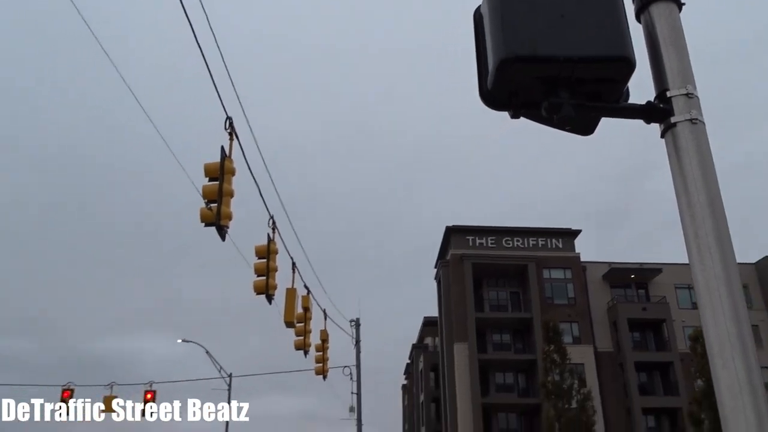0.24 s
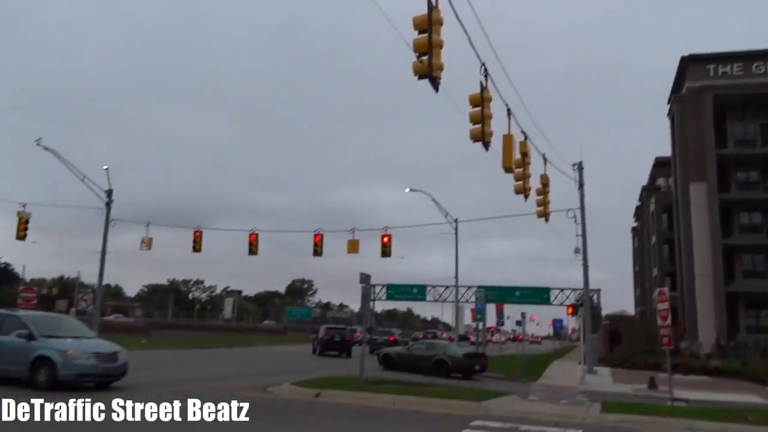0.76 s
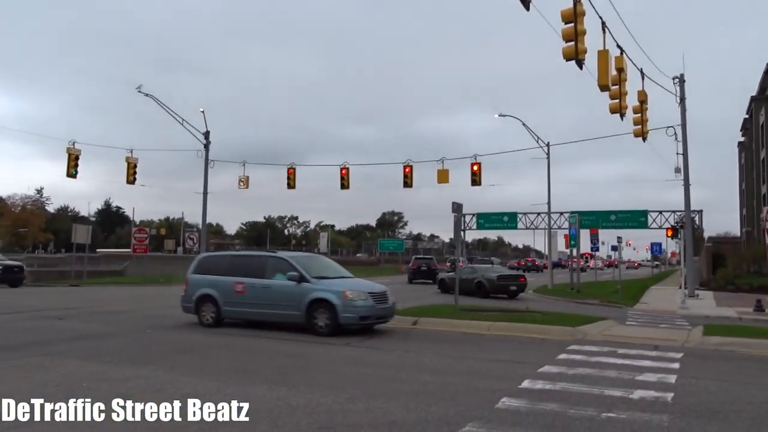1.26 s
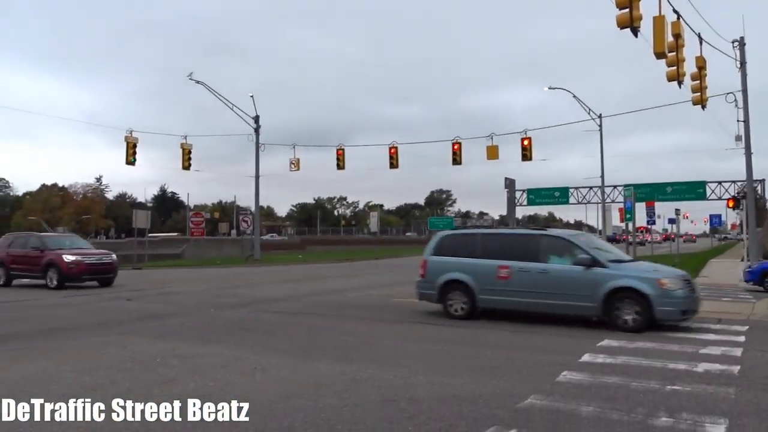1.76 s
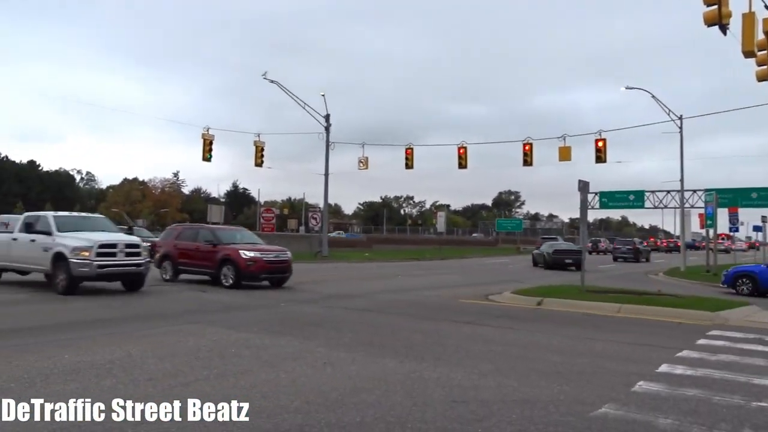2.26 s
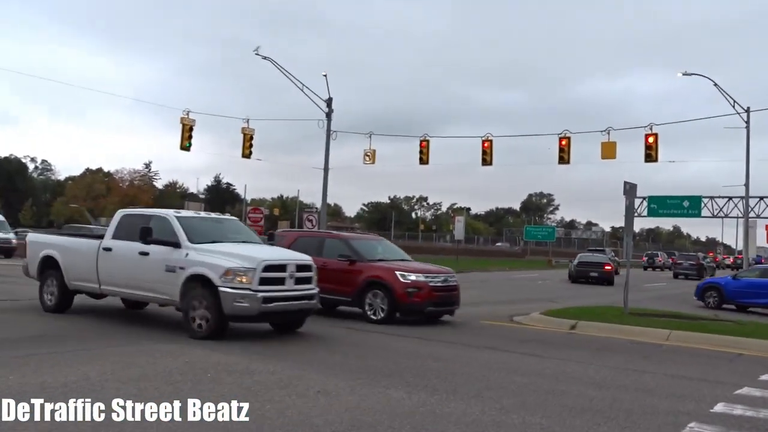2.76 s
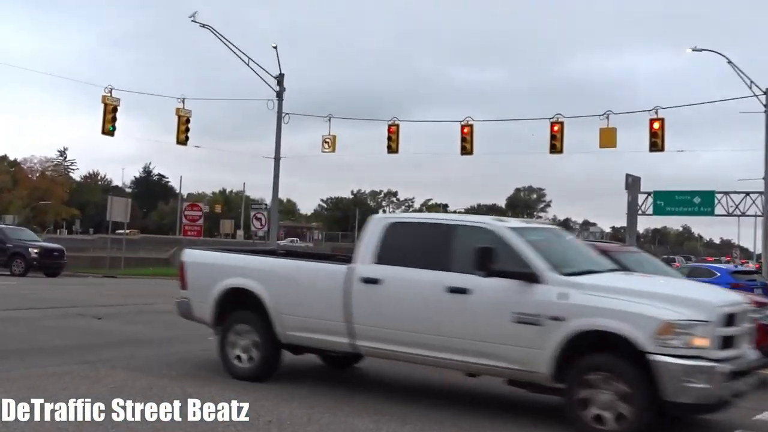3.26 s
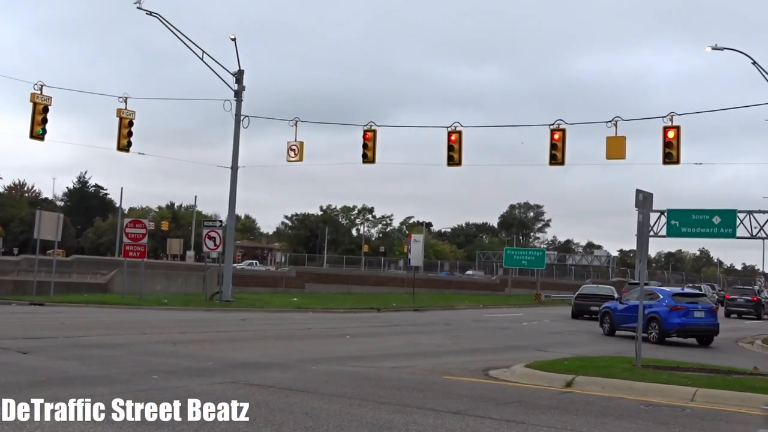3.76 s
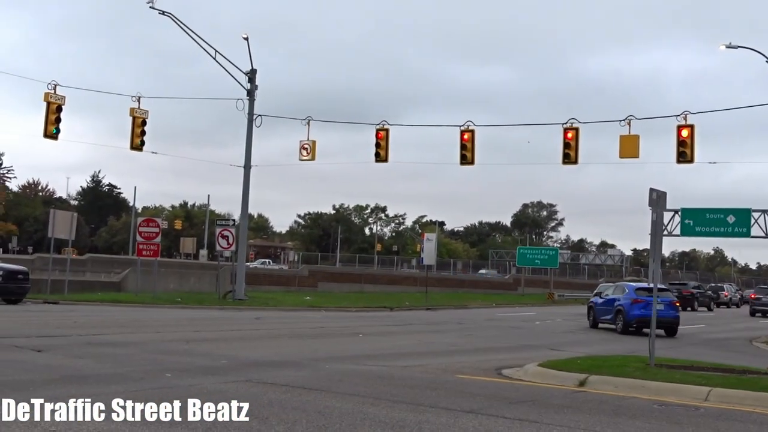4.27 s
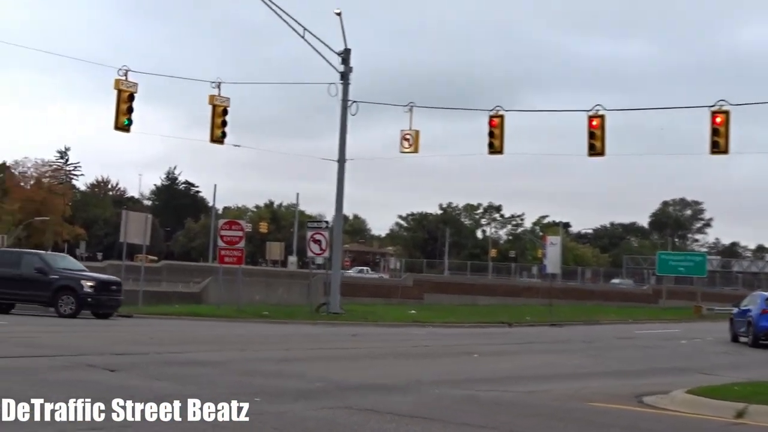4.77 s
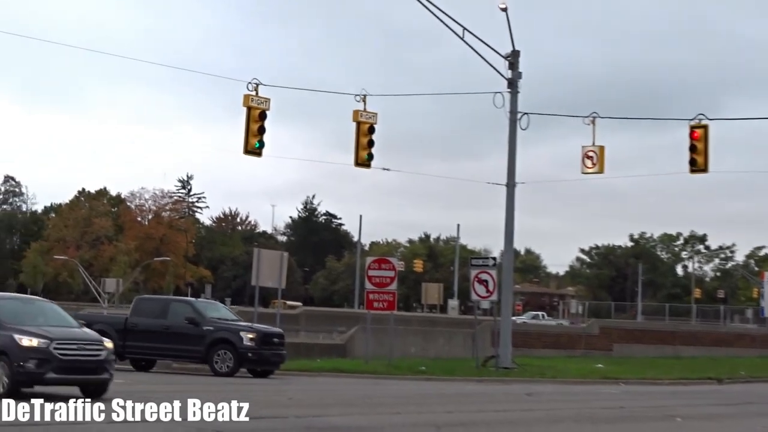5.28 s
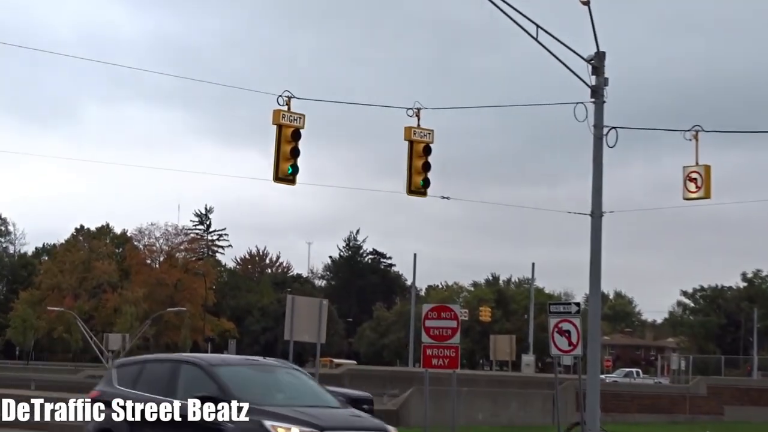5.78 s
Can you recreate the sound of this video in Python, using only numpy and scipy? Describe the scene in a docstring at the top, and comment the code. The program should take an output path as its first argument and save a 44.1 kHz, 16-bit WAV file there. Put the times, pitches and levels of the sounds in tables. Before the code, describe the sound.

Deep, burbling V8 exhaust pulls, changes up, pulls again and fades after another shift, amid passing tyres and faint, thin chirps.

```python
"""V8 at a busy road junction

A V8 with a boomy exhaust accelerates, shifts up, pulls on and shifts up again, heard on two microphone ports.
Overtones of its eight-cylinder cycle make the firing note, a burble from the uneven banks and a pipe rasp.
Banded noise makes the rushing gas and the traffic's rumble, roar and hiss, first to the left, then to the right.
Thin chirps of falling pitch and one sharp tick cut through; level and peaks are held down at the microphone."""
import sys
import numpy as np
from scipy import signal
from scipy.fft import rfft, irfft, next_fast_len
from scipy.io import wavfile
from scipy.ndimage import uniform_filter1d, minimum_filter1d

SR = 44100
rng = np.random.default_rng(int(sys.argv[2]) if len(sys.argv) > 2 else 0)


def to_wav(s):
    """Save 16-bit WAV."""
    ch = np.atleast_2d(s).T  # columns
    pcm = np.round(np.clip(ch, -1, 1) * 32767)  # PCM
    wavfile.write(sys.argv[1], SR, pcm.astype(np.int16))


N = 265923
TIME_S = np.arange(N) / SR

# exhaust boom, the firing note: [t/s, level/dB]
BOOM_LEVEL = [(0, -14), (.5, -13), (.8, -15), (1.25, -14), (1.43, -9), (1.57, -16), (1.98, -13.5),
              (2.24, -19), (2.45, -14.5), (3.28, -14.5), (3.8, -6.5), (4.2, -12.5), (4.47, -18),
              (4.65, -16), (5.02, -14), (5.29, -22.5), (5.38, -16.5), (5.5, -23), (6.03, -25)]
# engine speed, rising evenly in each gear: [engaged t/s, firing rate f/Hz, released t/s, firing rate f/Hz]
GEARS = [(0.0, 159.0, 1.21, 221.5), (1.54, 158.6, 5.26, 191.0), (5.44, 141.5, 6.1, 145.5)]
# rushing gas against the exhaust strength, one value per gear: [level/dB]
GEAR_GAS_DB = [4.5, -11.5, 2.5]
# strength of the exhaust, which drives burble, rasp and gas: [t/s, level/dB]
EXHAUST_STRENGTH = [(0, -31.5), (.7, -28.5), (1.22, -28), (1.5, -28.5), (2.0, -28.5), (2.35, -28),
                    (3.35, -28), (3.7, -30), (4.15, -30), (5.25, -29.5), (5.55, -37.5), (6.03, -37)]
# multiples of the eight-cylinder cycle that the uneven banks stress: [multiple, level/dB]
STRONG_ORDERS = [(5, 0), (10, -3.5), (11, 6), (13, 2.5), (19, 1.5)]
# the weaker multiples, before a common trim: [multiple, level/dB]
WEAK_ORDERS = [(4, -10.5), (6, -6), (7, -6), (9, -5.5), (12, -18), (14, -5.5), (15, -7.5), (16, -4),
               (17, -11), (18, -2.5), (20, -12), (21, -5), (22, -10)]
# single overtones of the burble that swell and fade: [centre t/s, half-width t/s, multiple, rise level/dB]
OVERTONE_SWELLS = [(0.144, 0.26, 19, 6), (0.253, 0.18, 11, 6.5), (.3, 0.27, 5, 4.5), (1.02, 0.44, 19, 7),
                   (1.55, 0.35, 14, 9), (2.4, 0.56, 14, 7.5), (2.345, 0.26, 11, 2.5), (2.4, 0.39, 10, 8),
                   (3.205, .22, 11, 5.5), (3.264, 0.2, 10, 13.5), (4.16, 0.18, 5, 4.5),
                   (4.191, .2, 19, 6.5), (4.863, 0.32, 13, 4.5)]
# silencer resonances, through which the burble slides: [f/Hz, level/dB]
SILENCER = [(88, -12), (107, -3.5), (114, 0.5), (150, -1.5), (200, -1), (237, -1), (247, -9.5), (256, -3),
            (273, -7.5), (300, -0.5), (325, -4), (345, -5.5), (420, -9.5), (480, -10.5)]
# tailpipe resonances, which colour the rasp: [f/Hz, level/dB]
TAILPIPE = [(400, -16.5), (520, -2), (555, -7), (600, 4), (670, -2.5), (760, -0.5), (930, -16),
            (1150, -6.5), (1500, -26)]
# colour of the rushing gas: [f/Hz, density level/dB per Hz]
GAS_COLOUR = [(40, -37), (90, -31), (150, 3), (200, -0.5), (300, -4.5), (450, -13), (700, -16), (1500, -40)]

# sharp tick: [t/s, crackle level/dB, fall by 60 dB t/s]
TICKS = [(1.6583, -23, .008)]
# thin scratchy chirps: [t/s, level/dB, starting pitch f/Hz, length t/s, before the lingering tail]
CHIRPS = [(0.286, -48, 5800, 0.019), (0.48, -50, 5800, .014), (0.724, -36.5, 7320, 0.016),
          (0.736, -44, 6130, 0.024), (0.801, -38, 5750, 0.02), (0.872, -41.5, 5800, 0.013),
          (1.315, -42.5, 5980, 0.027), (2.22, -44, 5940, 0.032), (2.362, -40, 5900, 0.017),
          (2.603, -40.5, 7000, 0.023), (2.718, -41, 5650, 0.012)]

# passing vehicles, half gain one approach before and one departure after the nearest point:
# [nearest t/s, approach t/s, departure t/s, tyre level/dB, rumble level/dB, brightness level/dB per tyre layer]
PASSES = [(0.0, .8, 0.61, -42, -37.5, -2.5), (0.95, 0.86, .55, -43, -42.5, 0.3),
          (1.75, 0.49, 1, -43.5, -40, -0.2), (3.12, 1.56, 0.88, -43, -42.5, 2.3),
          (4.05, .25, 0.4, -53, -53, 3.5), (6.15, .3, .5, -60, -42.5, -7.5)]
# two bands of bright hiss from the close pass: [centre f/Hz, width f/Hz, level/dB]
CLOSE_HISS_BANDS = [(7400, 900, -0.5), (13000, 2000, -5.5)]
# position across the road: [t/s, left minus right level/dB]
SIDE_OF_ROAD = [(0, 7), (.6, 7), (1.3, 4), (3.0, 3.5), (3.65, -1.5), (4.1, -8.5), (5.0, -6.5), (6.03, 0)]
# balance of the tyre layers roar, rush, hiss, spray: [level/dB]
TYRE_LAYERS_DB = [6, -0.5, -5.5, -15.5]
# steady distant traffic: rumble, roar, rush, hiss, spray, before each layer's trim: [level/dB]
DISTANT_DB = [-54.5, -44, -53, -58.5, -81.5]
# colours of the traffic layers: [f/Hz, density level/dB per Hz]
RUMBLE_COLOUR = [(20, -11), (45, -7.5), (65, 5), (95, 1), (160, -8.5), (400, -35)]
ROAR_COLOUR = [(200, -7.5), (450, -1.5), (750, 4.5), (1000, 1.5), (1220, -1), (1450, -3), (1900, -12.5),
               (2600, -22)]
RUSH_COLOUR = [(1300, -5.5), (1750, 1.5), (2250, 2.5), (2600, -1), (3000, -1), (3400, -6.5), (4500, -12)]
HISS_COLOUR = [(3200, -0.5), (4000, -1.5), (5000, 2), (6100, 0), (6700, 3), (7400, -1), (8300, -2),
               (10000, -19), (12000, -23.5)]
SPRAY_COLOUR = [(7000, -14.5), (9500, 5), (11300, 0), (13000, -2.5), (14500, -8.5), (16000, -16.5)]

# likeness of left and right in the noise: [f/Hz, share 0-1]
LIKENESS = [(60, 1), (300, 0.97), (700, 1), (1400, 1), (3000, 0.9), (7000, 1), (15000, 0.2)]
# phase between the two microphone ports: [f/Hz, lead of the left/rad]
PORT_PHASE = [(40, -.1), (110, 0.43), (180, -0.42), (700, -0.56), (1500, -0.96), (3500, -0.26), (8000, 0)]

BOOM_LEAN_DB = 0.96  # the low note is offset to the left
# the flywheel rounds each shift; just after a gear bites the speed sags by a share
FLYWHEEL_S, SAG_SHARE, SAG_S, SAG_AFTER_S = 0.1, 0.0345, 0.0697, 0.06
# a puff of gas follows each release
PUFF_DB, PUFF_AFTER_S, PUFF_S = 8, 0.04, 0.07
# rasp level at the exhaust's usual strength, and the factor by which it follows that strength
RASP_DB, EXHAUST_USUAL_DB, RASP_FOLLOWS = -30.5, -29, 1.5
# rasp tilt above the main resonance (dB per octave), steepening as the V8 draws away (dB per octave per s)
PIPE_MAIN_HZ, RASP_TILT_DB, RASP_DULLING_DB = 565, -3.5, 12
# the V8 draws away from this moment, its rasp fading in dB per s
AWAY_S, RASP_FADE_DB = 3.31, 3
CHIRP_TARGET_HZ = 4900  # each glide stops short of this pitch
# close pass: row of PASSES, hiss level at its nearest, power of the nearness that it follows
CLOSE_PASS, CLOSE_HISS_DB, CLOSE_FOCUS = 3, -50, 2.0
AGC_CEILING_DB, AGC_WINDOW_S = -12, 0.027  # rms ceiling and averaging time
LIMIT_DB, LIMIT_HOLD_S = -5.5, 0.0058
CUTOFF_HZ = 15700


def engine():
    """Firing note, burble, rasp and rushing gas; the higher parts lean further to the side of the road."""
    firing_hz, gas_db, puff = gearbox()
    exhaust_db, = in_time(EXHAUST_STRENGTH)
    pan_db, = in_time(SIDE_OF_ROAD)
    firing_angle = 2 * np.pi * np.cumsum(firing_hz) / SR
    cycle = firing_angle / 8  # eight firings to a cycle
    away_s = np.maximum(TIME_S - AWAY_S, 0)
    rasp_db = RASP_DB + RASP_FOLLOWS * (exhaust_db - EXHAUST_USUAL_DB) - RASP_FADE_DB * away_s

    boom = from_db(in_time(BOOM_LEVEL)[0]) * engine_line(firing_angle, waver=0.098)
    lumps = from_db(exhaust_db + 0.42) * burble(
        cycle, firing_hz, scatter=1.0, weak_scatter=1.0, strong_waver=0.09, weak_waver=0.32, weak_db=1.17)
    pipe = from_db(rasp_db) * rasp(cycle, firing_hz, away_s, bank_db=2.5, uneven_db=3.5, waver=0.88)
    gas = from_db(exhaust_db + gas_db + PUFF_DB * puff) * banded_noise(GAS_COLOUR, flutter_db=5.5)

    low = panned(boom, 0.23 * pan_db + BOOM_LEAN_DB)
    return low + panned(lumps + gas, 0.5 * pan_db) + panned(pipe, 1.05 * pan_db)


def gearbox():
    """Firing rate, level of rushing gas and puffs: speed climbs in gear, drops at a shift, sags as it bites."""
    knots = []
    for (on, on_hz, off, off_hz), db in zip(GEARS, GEAR_GAS_DB):
        knots += [(on, on_hz, db), (off, off_hz, db)]
    hz, gas_db = in_time(knots)
    rounded_hz = uniform_filter1d(hz, int(FLYWHEEL_S * SR), mode="nearest")
    sag = sum(swell(gear[0] + SAG_AFTER_S, SAG_S) for gear in GEARS[1:])
    puff = sum(swell(gear[2] + PUFF_AFTER_S, PUFF_S) for gear in GEARS[:-1])
    return rounded_hz * (1 - SAG_SHARE * sag), gas_db, puff


def burble(cycle, firing_hz, scatter, weak_scatter, strong_waver, weak_waver, weak_db):
    """One weak beat a cycle puts lines between the firing harmonics; the silencer colours them."""
    def line(multiple, db, offset, waver):
        """One overtone sliding through the silencer, with its swells."""
        k = round(multiple)
        hz = k * firing_hz / 8
        swell_db = sum(rise_db * swell(s, width)
                       for s, width, which, rise_db in OVERTONE_SWELLS if round(which) == k)
        return from_db(db + at_hz(SILENCER, hz) + swell_db) * engine_line(k * cycle + offset, waver)

    # high multiples wander most
    strong = sum(line(k, db, scatter * drift(0.33), strong_waver + (k / 29) ** 3)
                 for k, db in STRONG_ORDERS)
    weak = sum(line(k, db + weak_db, weak_scatter * drift(0.32), weak_waver) for k, db in WEAK_ORDERS)
    return -strong - weak  # roughly opposed to the firing note


def rasp(cycle, firing_hz, away_s, bank_db, uneven_db, waver):
    """High multiples slide through the tailpipe's resonances, the banks stressing some; about rms 1."""
    tilt = RASP_TILT_DB - RASP_DULLING_DB * away_s
    out, power = 0, 0
    for multiple in range(23, 62):
        stressed = multiple % 8 in (3, 5)  # three off a firing harmonic
        hz = multiple * firing_hz / 8
        edge_db = tilt * np.log2(np.maximum(hz / PIPE_MAIN_HZ, 1))
        gain = from_db(at_hz(TAILPIPE, hz) + edge_db + bank_db * stressed + uneven_db * drift(2.1))
        out = out + gain * engine_line(multiple * cycle + rng.uniform(0, 2 * np.pi), waver)
        power = power + gain ** 2
    return out / np.sqrt(power)


def engine_line(angle, waver):
    """One multiple of the engine cycle, about rms 1; no two cycles burn quite alike."""
    in_step = (1 + waver * drift(9.0)) * np.cos(angle)
    out_of_step = waver * drift(6.8) * np.sin(angle)
    return np.sqrt(2 / (1 + 2 * waver ** 2)) * (in_step + out_of_step)


def ticks(snap_hz, snap_db, ring_hz, ring_db, pan_db):
    """A tiny hard contact: one quick snap with a crackle and a very high ring, gone in milliseconds."""
    out, t = np.zeros(N), np.arange(SR // 20) / SR
    for s, db, t60 in TICKS:
        snap = from_db(snap_db) * np.sin(2 * np.pi * snap_hz * t) * np.exp(-snap_hz * t)
        treble = signal.butter(1, 2500, "high", fs=SR, output="sos")
        crackle = signal.sosfilt(treble, rng.standard_normal(len(t)))
        ring = from_db(ring_db) * np.sin(2 * np.pi * ring_hz * t)
        at = int(s * SR)
        out[at:at + len(t)] += from_db(db - 60 * t / t60) * (snap + crackle + ring)
    return panned(out, pan_db)


def chirps(linger, pan_db):
    """Each chirp is a short, scratchy whistle that clears as it falls and lingers on its last pitch."""
    out, rough = np.zeros(N), 0.72
    for s, db, start_hz, length in CHIRPS:
        u = np.arange(int(3 * length * SR)) / (length * SR)  # 1 at the nominal length
        scratch = rms_one(uniform_filter1d(rng.standard_normal(SR), size=14))[:len(u)]
        glide = np.maximum(1 - u ** 2, 0.3)
        hz = CHIRP_TARGET_HZ + (start_hz - CHIRP_TARGET_HZ) * glide * (1 + rough * scratch)
        envelope = np.sin(np.pi * np.minimum(u, 1)) + linger * u * np.exp(-u)
        whistle = np.sqrt(2) * np.sin(2 * np.pi * np.cumsum(hz) / SR)
        at = int(s * SR)
        out[at:at + len(u)] += from_db(db) * envelope * whistle
    return panned(out, pan_db)


def close_pass(pan_share, spread):
    """A close pass adds a smooth, bright hiss in two narrow bands that follows its nearness."""
    out = 0
    for hz, width, db in CLOSE_HISS_BANDS:
        band = signal.butter(2, [hz - width / 2, hz + width / 2], "band", fs=SR, output="sos")
        mid, side = signal.sosfilt(band, rng.standard_normal((2, N)))
        out = out + from_db(db) * rms_one(mid + spread * side * [[1], [-1]])
    s, approach, departure, *_ = PASSES[CLOSE_PASS]
    gain = from_db(CLOSE_HISS_DB) * nearness(s, approach, departure) ** CLOSE_FOCUS
    return panned(gain * out, pan_share * in_time(SIDE_OF_ROAD)[0])


def traffic():
    """Bodies rumble, tyres roar and rush, and the nearest treads add a bright hiss: noise in five layers."""
    rumble_db, roar_db, rush_db, hiss_db, spray_db = traffic_levels()
    pan_db, = in_time(SIDE_OF_ROAD)
    smooth_db = 0.55
    grip = from_db(smooth_db * drift(23))  # the uneven road shakes all the tyre noise together
    rumble = from_db(rumble_db + 4.5) * banded_noise(RUMBLE_COLOUR, flutter_db=3.5)
    roar = from_db(roar_db + 4.0) * banded_noise(ROAR_COLOUR, flutter_db=1.5)
    rush = from_db(rush_db + 2.0) * banded_noise(RUSH_COLOUR, flutter_db=1.53)
    hiss = from_db(hiss_db) * banded_noise(HISS_COLOUR, smooth_db)
    spray = from_db(spray_db + 0.5) * banded_noise(SPRAY_COLOUR, smooth_db)
    tyres = panned(roar + spray, 1.28 * pan_db) + panned(rush + hiss, 0.59 * pan_db)
    return panned(rumble, 0.25 * pan_db) + grip * tyres


def traffic_levels():
    """Layer levels in dB: the passing vehicles add their power to the distant traffic."""
    power = from_db(DISTANT_DB)[:, None] ** 2
    layer = np.arange(len(TYRE_LAYERS_DB)) - 1.5  # from dull to bright
    for s, approach, departure, tyre_db, rumble_db, bright_db in PASSES:
        tyres_db = tyre_db + np.array(TYRE_LAYERS_DB) + bright_db * layer
        gain = np.outer(from_db([rumble_db, *tyres_db]), nearness(s, approach, departure))
        power = power + gain ** 2
    return 10 * np.log10(power)


def nearness(s, approach, departure):
    """Gain of a passing vehicle, 1 at its nearest."""
    dt = TIME_S - s
    return 1 / (1 + (dt / np.where(dt < 0, approach, departure)) ** 2)


def banded_noise(colour, flutter_db):
    """Stereo noise in adjoining bands, each fluttering on its own; rms 1."""
    low, high = colour[0][0], min(colour[-1][0], 0.45 * SR)
    edges = np.geomspace(low, high, num=len(colour) + 5)
    white, out = rng.standard_normal((2, 2, N)), 0
    for k, band in enumerate(zip(edges, edges[1:])):
        band_filter = signal.butter(2, band, "band", fs=SR, output="sos")
        mid, side = signal.sosfilt(band_filter, white[k % 2])  # neighbours use separate noise
        hz = np.sqrt(band[0] * band[1])
        alike = np.clip(at_hz(LIKENESS, hz), 0, 1)
        gain = from_db(at_hz(colour, hz) + flutter_db * drift(14.7))
        out = out + gain * (np.sqrt(1 + alike) * mid + np.sqrt(1 - alike) * side * [[1], [-1]])
    return rms_one(out)


def drift(rate):
    """Slow chance with spread 1: noise smoothed to wander at about rate (Hz) and below."""
    step = 100  # samples between the random values
    r = np.exp(-2 * np.pi * rate * step / SR)
    noise = rng.standard_normal(N // step + 1002)
    slow = signal.lfilter([1], [1, -2 * r, r * r], noise)[1000:]  # drop the run-in
    return np.interp(np.arange(N) / step, np.arange(len(slow)), rms_one(slow))


def swell(s, width):
    """A smooth bump of height 1 around a moment."""
    return np.exp(-((TIME_S - s) / width) ** 2)


def panned(x, pan_db):
    """Share a sound between left and right at constant power."""
    return x * from_db(np.array([[1], [-1]]) * pan_db / 2) / np.sqrt(np.cosh(pan_db * np.log(10) / 20))


def in_time(rows):
    """Each column of a curve at every sample."""
    s, *columns = np.transpose(rows)
    return [np.interp(TIME_S, s, c) for c in columns]


def at_hz(points, hz):
    """Read a spectrum on a log-frequency axis."""
    point_hz, value = np.array(points).T
    return np.interp(np.log(hz), np.log(point_hz), value)


def from_db(db):
    """Decibels to gain."""
    return 10 ** (np.asarray(db) / 20)


def rms_one(x):
    """Scale to unit rms."""
    return x / np.sqrt(np.mean(x ** 2) + 1e-20)


def gain_control(x):
    """When the exhaust booms over the ceiling, the gain sinks and the whole street ducks with it."""
    window = int(AGC_WINDOW_S * SR)
    level = np.sqrt(np.abs(uniform_filter1d(np.mean(x ** 2, axis=0), window)) + 1e-12)
    return x * uniform_filter1d(np.minimum(1, from_db(AGC_CEILING_DB) / level), window)


def limiter(x):
    """The gain dips around every peak that passes the ceiling, and the hiss dips with it."""
    needed = np.minimum(1, from_db(LIMIT_DB) / (np.abs(x).max(axis=0) + 1e-9))
    hold = max(1, int(LIMIT_HOLD_S * SR))
    return x * uniform_filter1d(minimum_filter1d(needed, hold), hold)


def scene():
    """Everything at the junction, in the open air."""
    tick = ticks(snap_hz=4800, snap_db=8.0, ring_hz=14200, ring_db=0.0, pan_db=0.5)
    foreground = engine() + tick + chirps(linger=0.78, pan_db=2.5)
    return foreground + close_pass(pan_share=0.15, spread=0.35) + traffic()


def record(dry):
    """The two ports are slightly out of phase, level and peaks are held down, and the top is cut steeply."""
    size = next_fast_len(N + SR // 4)
    hz = np.maximum(np.arange(size // 2 + 1) * SR / size, 1)
    turn = np.exp(0.5j * at_hz(PORT_PHASE, hz) * np.array([[1], [-1]]))
    ports = irfft(rfft(dry, size) * turn, size)[:, :N]
    held = limiter(gain_control(ports))
    return signal.sosfilt(signal.ellip(10, 0.1, 90, CUTOFF_HZ, fs=SR, output="sos"), held)


dry = scene()
out = record(dry)
to_wav(out)
```